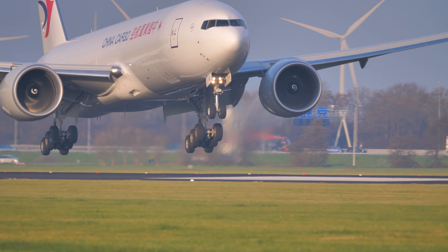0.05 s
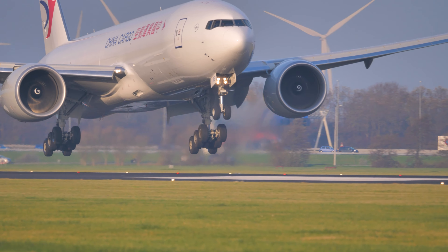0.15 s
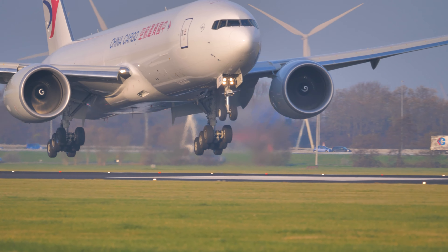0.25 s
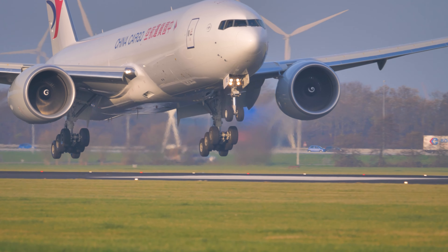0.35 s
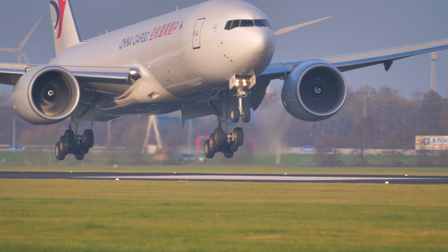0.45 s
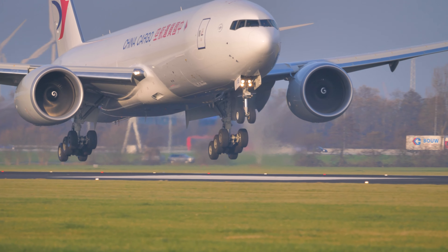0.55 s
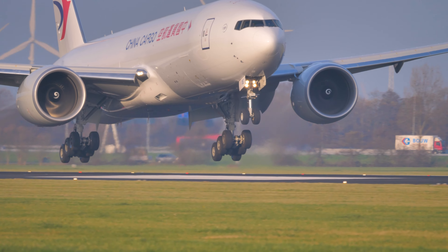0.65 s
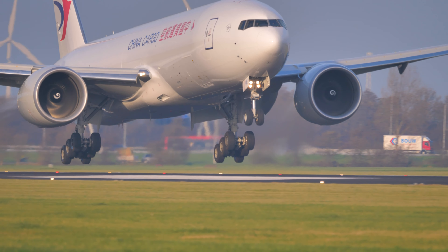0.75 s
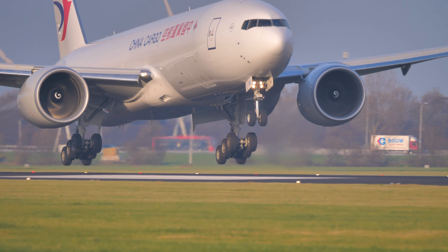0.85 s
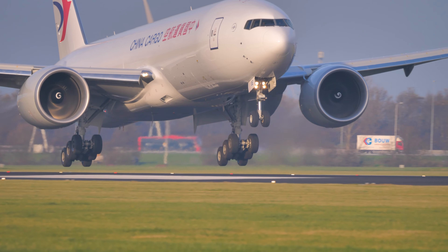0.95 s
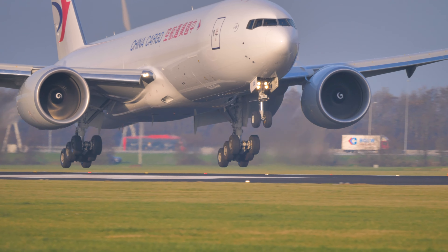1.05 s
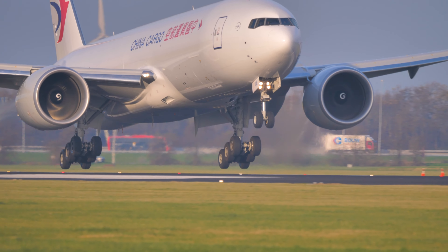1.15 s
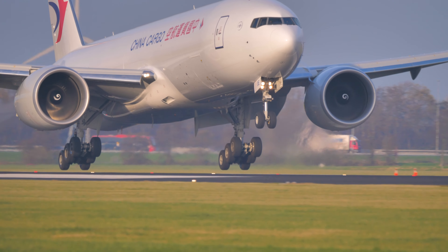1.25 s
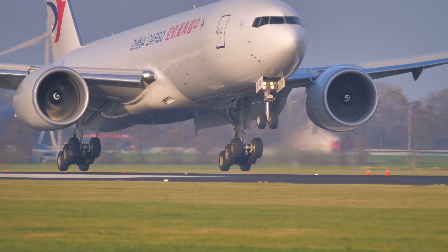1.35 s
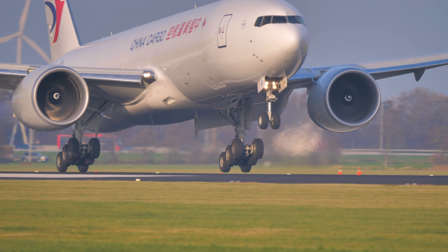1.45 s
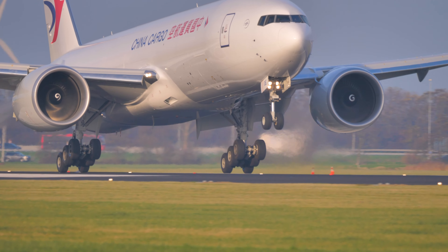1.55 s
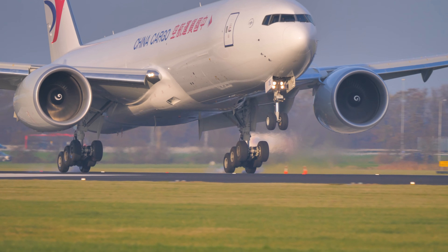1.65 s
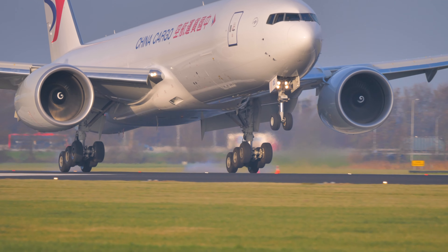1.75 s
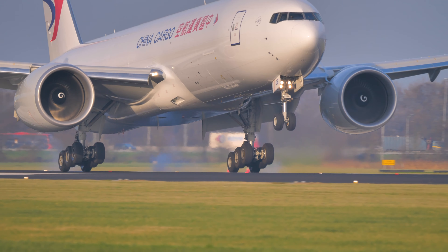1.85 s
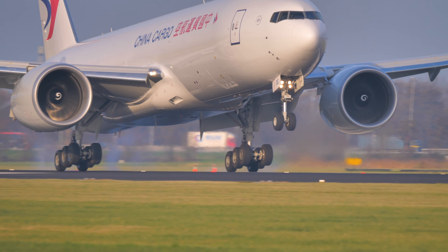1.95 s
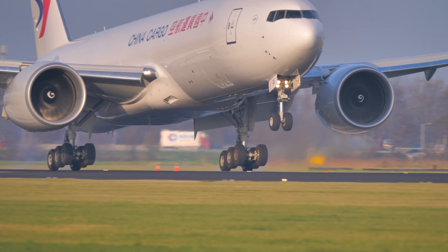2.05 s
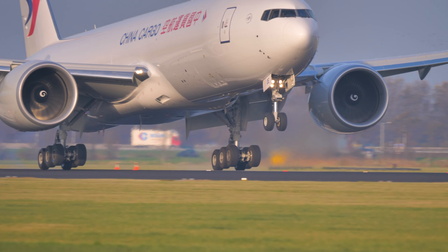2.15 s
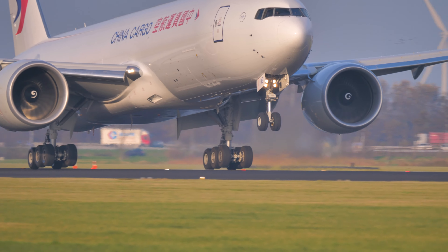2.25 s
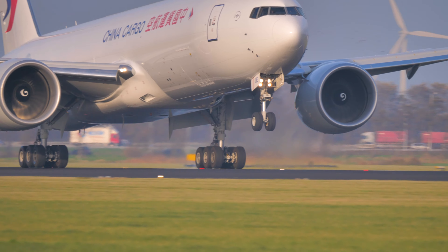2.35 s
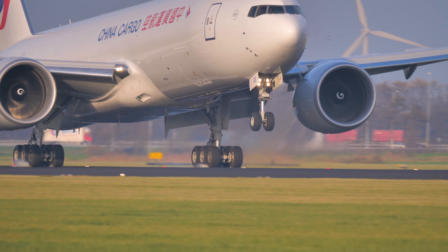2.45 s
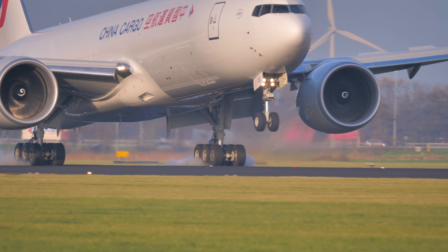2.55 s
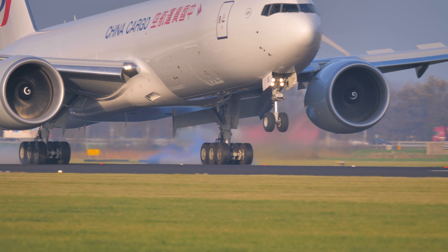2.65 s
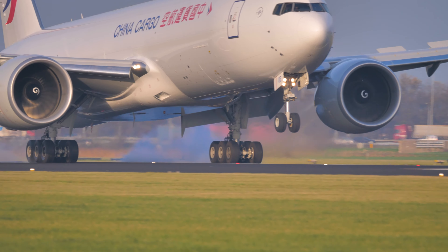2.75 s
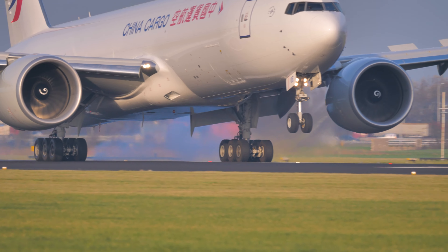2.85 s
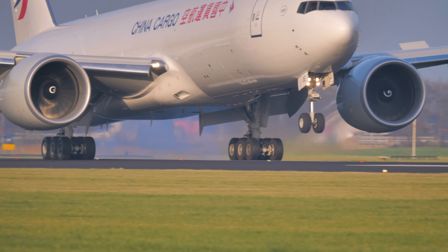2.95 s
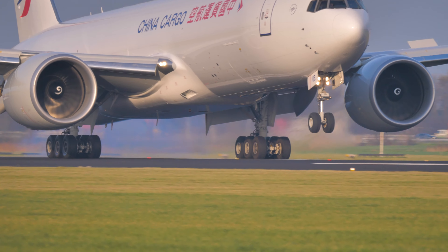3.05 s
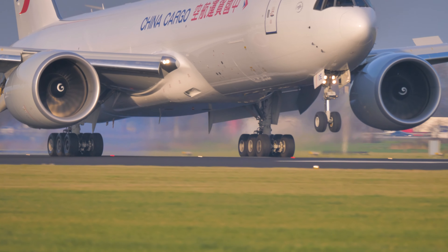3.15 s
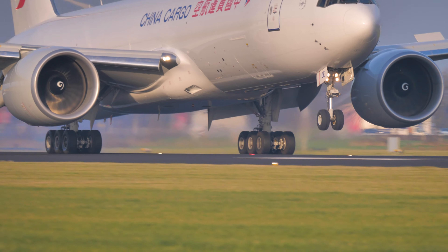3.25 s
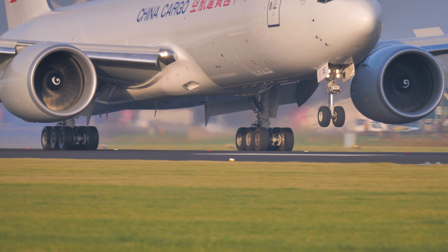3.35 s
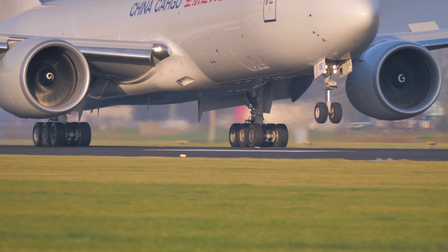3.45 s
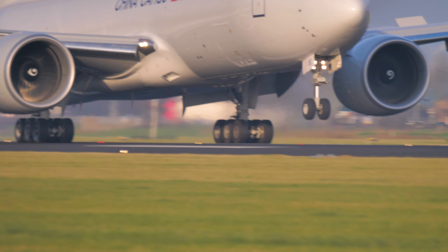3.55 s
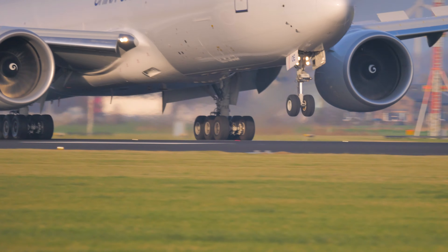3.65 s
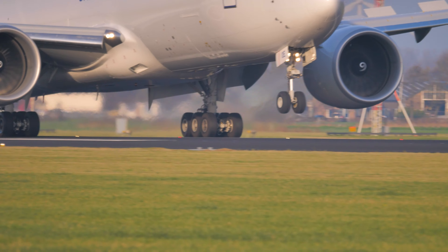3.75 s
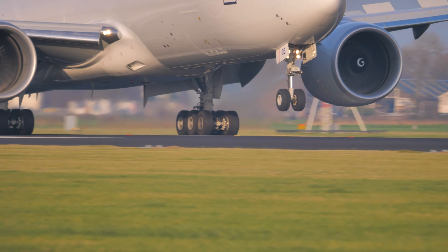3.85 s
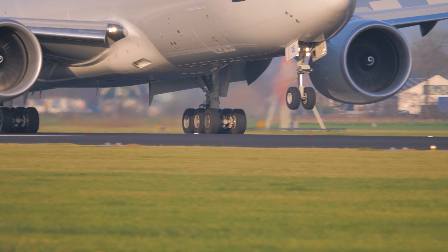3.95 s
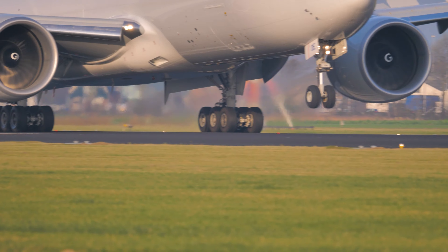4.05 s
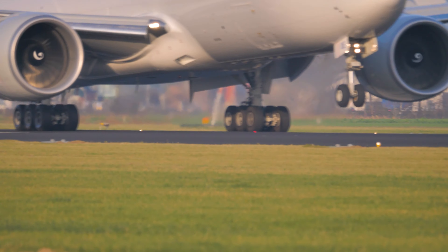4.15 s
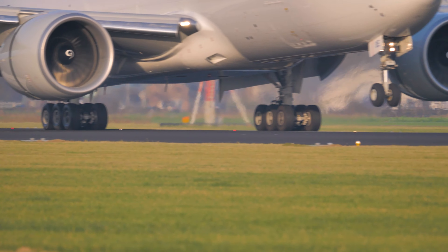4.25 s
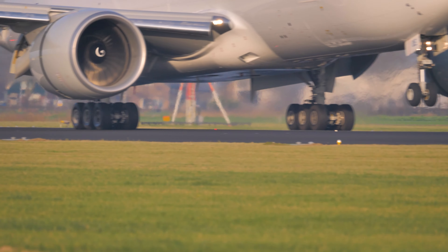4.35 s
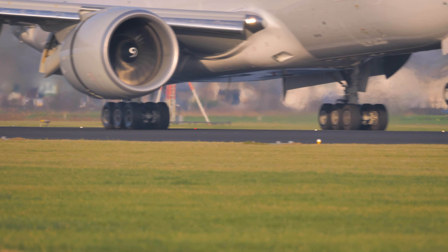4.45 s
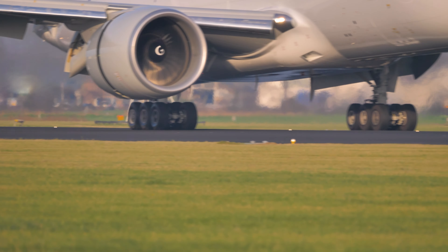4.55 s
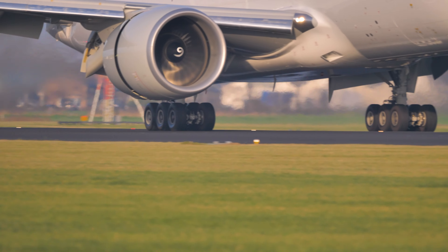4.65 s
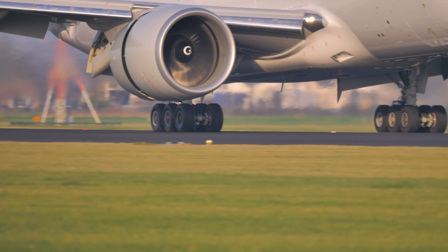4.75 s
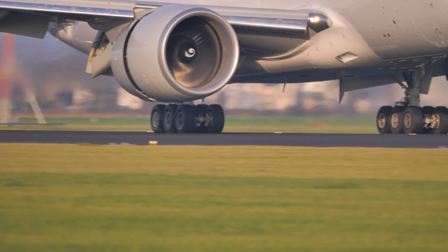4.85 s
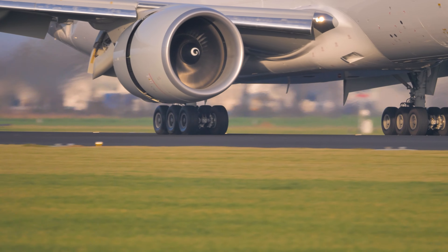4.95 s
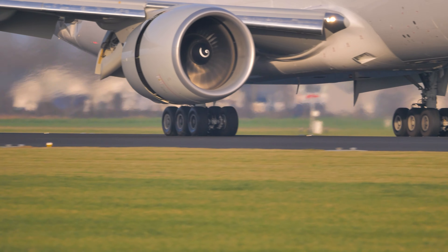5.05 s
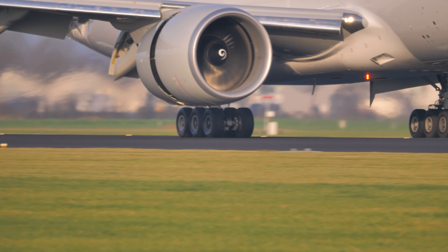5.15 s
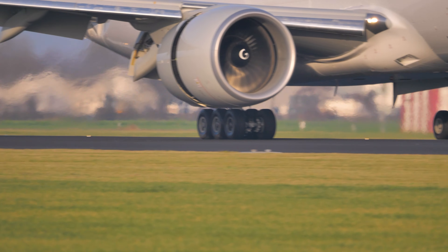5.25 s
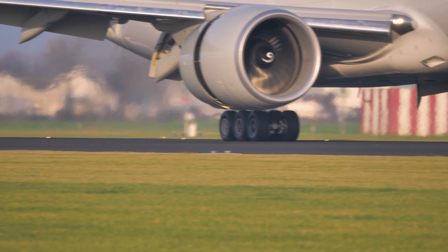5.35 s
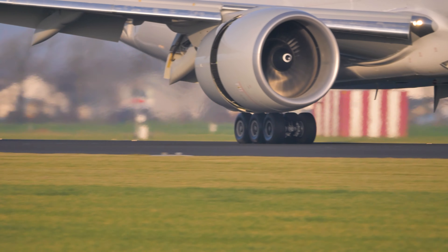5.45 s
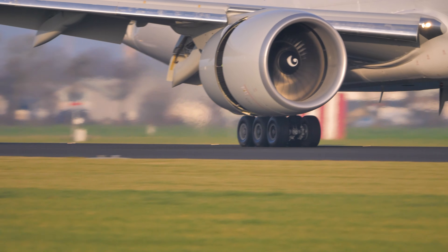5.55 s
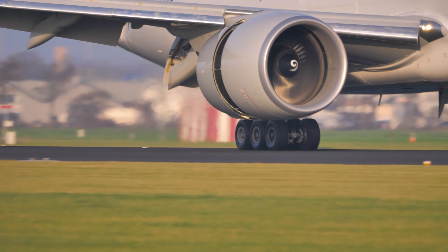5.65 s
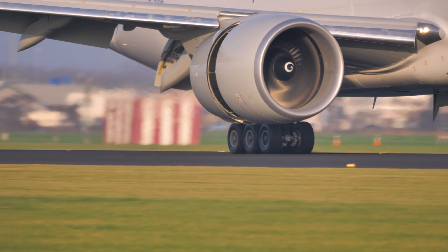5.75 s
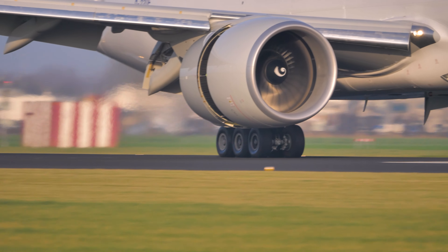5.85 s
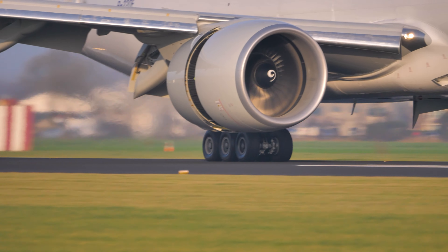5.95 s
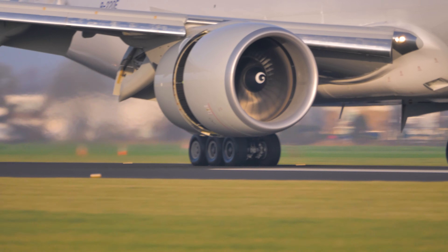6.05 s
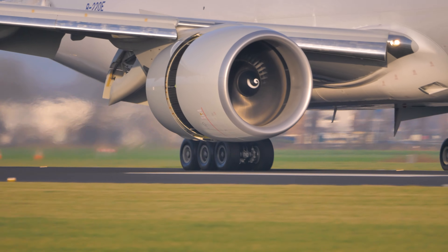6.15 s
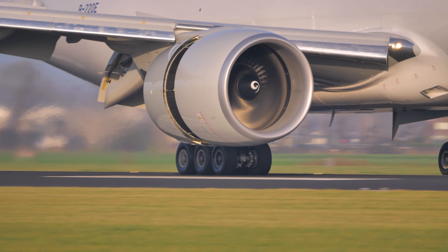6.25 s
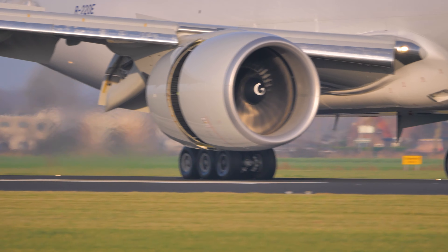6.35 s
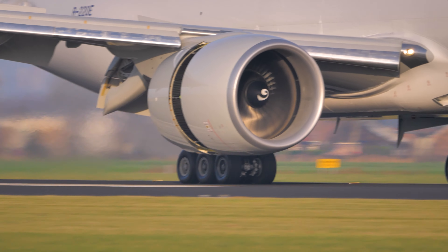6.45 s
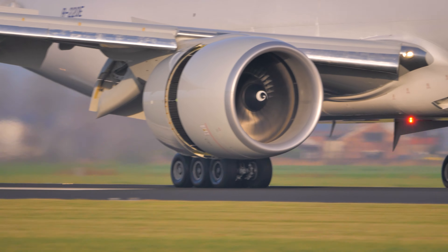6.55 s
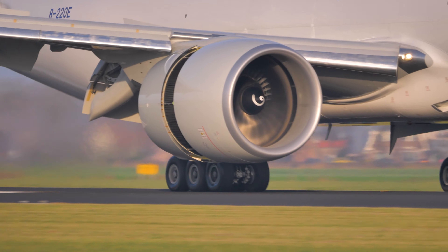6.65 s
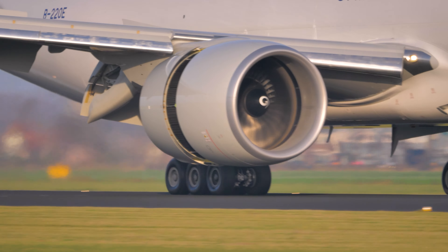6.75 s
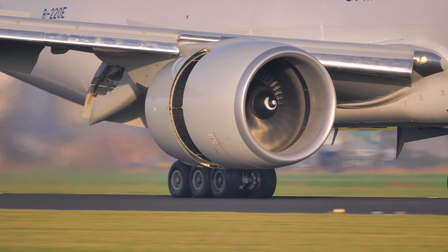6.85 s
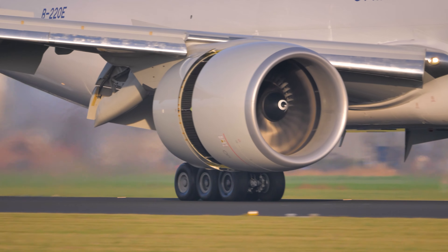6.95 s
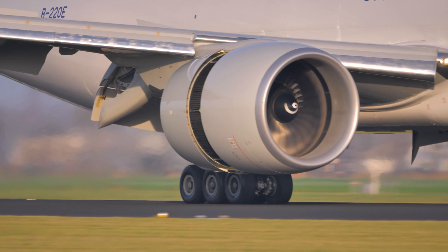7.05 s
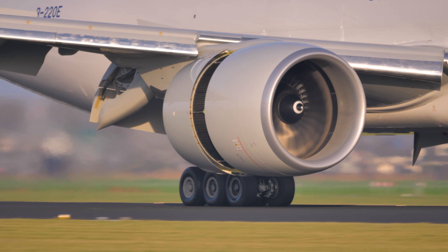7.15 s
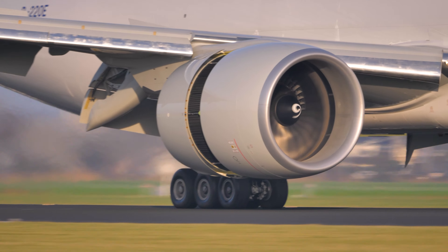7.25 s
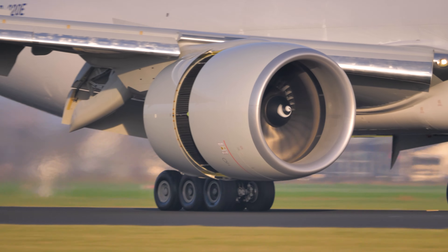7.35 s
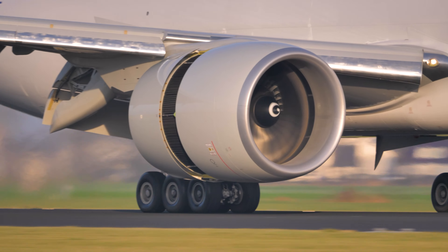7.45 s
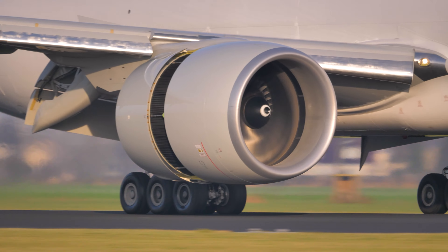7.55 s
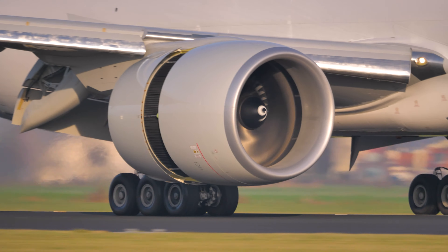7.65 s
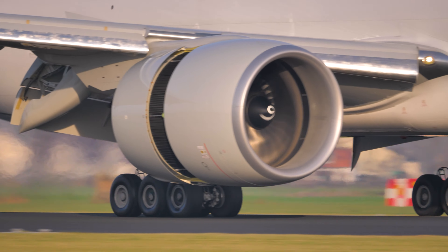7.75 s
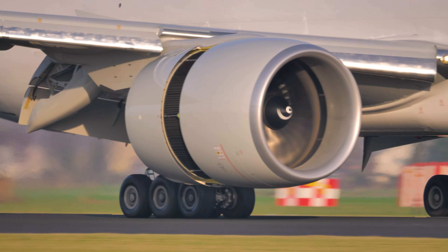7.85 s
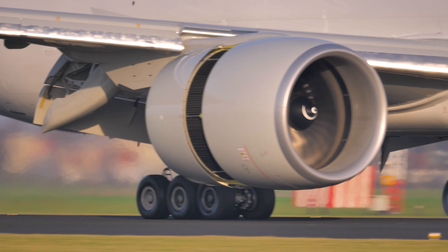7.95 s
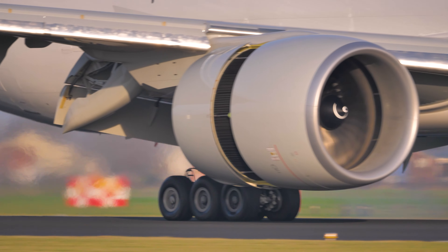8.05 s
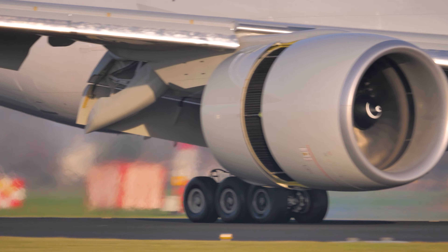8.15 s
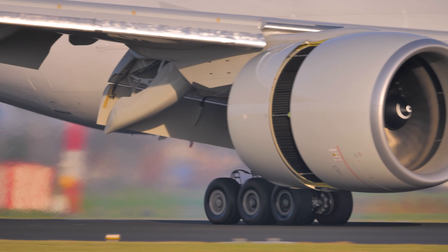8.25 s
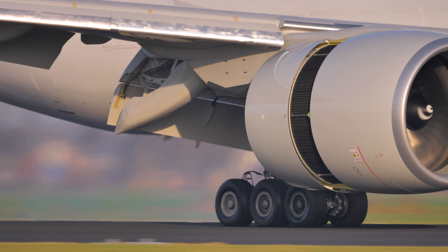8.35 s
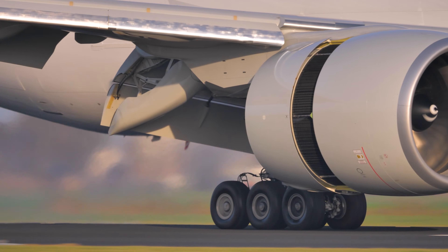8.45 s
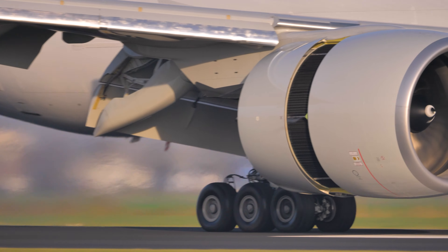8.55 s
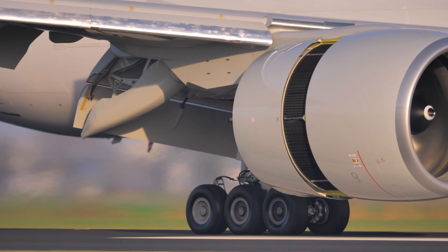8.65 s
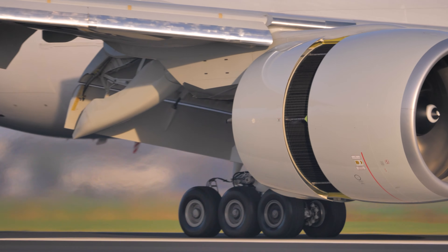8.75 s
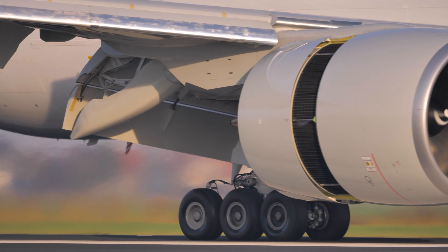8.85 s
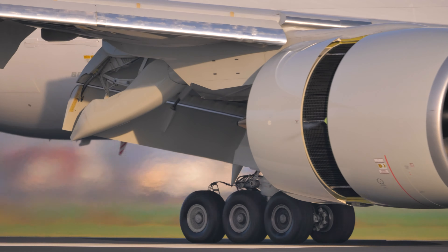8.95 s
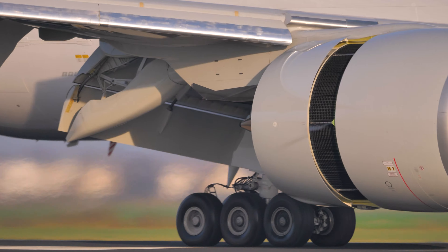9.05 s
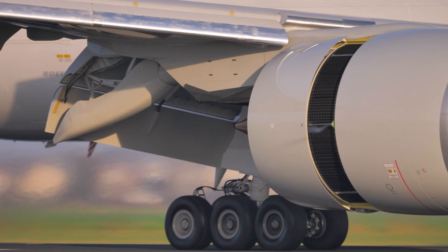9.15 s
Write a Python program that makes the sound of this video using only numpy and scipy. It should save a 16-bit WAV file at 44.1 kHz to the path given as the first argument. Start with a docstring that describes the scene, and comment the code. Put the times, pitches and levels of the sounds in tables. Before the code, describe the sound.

Outdoors beside a runway, a single-channel camera microphone is buffeted by gusty wind. A large jet's low exhaust rumble and dull distant roar come with thin fluttering whines that slowly sink as one engine spools down. A tiny bird twitters faintly early on. A second engine idles with a higher whine as the plane rolls nearer, then near eight seconds reverse thrust makes the whines jump up and the roar swell, bright and loud.

```python
"""A twin-engine jet freighter lands and rolls towards a camera beside the runway.
Coloured noise makes exhaust rumble, fan roar, a far hum and wind; low sines buffet the microphone.
A small far-off bird soon twitters in gliding sines; thin pulse bursts buzz inside the camera at 2 and 6 s.
Blade whines, fluttering tones, sink as the first engine spools down; the second is heard idling from 5 s.
Near 8 s its whines jump up with reverse thrust, while roar and rumble swell and the roar brightens."""
import sys
import numpy as np
from scipy import signal
from scipy.fft import rfft, irfft, next_fast_len
from scipy.io import wavfile
from scipy.ndimage import uniform_filter1d

SR = 44100
rng = np.random.default_rng(int(sys.argv[2]) if len(sys.argv) > 2 else 0)


def transcribe(u):
    """Save the signal u as a 16-bit wav file named by the first command-line argument.

    u: samples, shape (n,) or (channels, n), limited to [-1, 1]; the rate is SR.
    q: integer samples, one column per channel.
    """
    v = np.clip(np.atleast_2d(u).T, -1, 1)
    q = np.round(v * 32767).astype(np.int16)
    wavfile.write(sys.argv[1], SR, q)


N = 405719  # samples
SIZE, HOP = 2048, 512  # short-time spectra, samples
FRAMES = N // HOP + 5


def gain_of(db):
    """Decibels to an amplitude factor."""
    return 10 ** (np.asarray(db) / 20)


def evened(x):
    """Scales to rms 1."""
    return x / np.sqrt(np.mean(abs(x) ** 2) + 1e-20)


def read(points, hz):
    """Interpolates a spectrum table on a log-frequency axis."""
    point_hz, value = np.transpose(points)
    return np.interp(np.log(hz + 1), np.log(point_hz + 1), value)


def add(mix, start_s, sound):
    """Mixes a sound in at a time, cut off at the end of the mix."""
    part = mix[max(round(start_s * SR), 0):][:len(sound)]
    part += sound[:len(part)]


def columns(rows):
    """Sample times from a table's first to last time, then its other columns at those times."""
    point_s, *rest = np.transpose(rows)
    t = np.arange(point_s[0], point_s[-1], 1 / SR)
    return [t] + [np.interp(t, point_s, column) for column in rest]


def over_time(rows, column):
    """One column of a curve at every sample."""
    table = np.transpose(rows)
    return np.interp(np.arange(N) / SR, table[0], table[column])


def noise(colour, patchy_db, loss_db=0):
    """Random short-time spectra of a colour with drifting patches; rms 1 before the treble loss."""
    hz = np.fft.rfftfreq(SIZE, 1 / SR)[:, None]
    real, imag, patches = rng.standard_normal((FRAMES, len(hz), 3)).T
    patches = uniform_filter1d(patches, size=20, axis=0)  # over frequency
    patches = evened(uniform_filter1d(patches, size=8, axis=1))  # over time
    spectra = (real + 1j * imag) * gain_of(read(colour, hz) + patchy_db * patches)
    rms = np.std(signal.istft(spectra, nperseg=SIZE, noverlap=SIZE - HOP)[1])
    # air absorbs more the higher the pitch
    spectra = spectra * gain_of(-loss_db * (hz / 5000) ** 1.6)
    return signal.istft(spectra, nperseg=SIZE, noverlap=SIZE - HOP)[1][:N] / rms


def rumble():
    """Large eddies of the exhaust jets: low noise that swells as the aircraft nears."""
    # exhaust level: time_s, rms_db
    level = [(0, -38), (1, -34.5), (2.8, -34.5), (3.15, -37), (3.6, -34.5), (5.2, -34.5), (6, -32.5),
             (6.7, -34.5), (7.6, -30), (8, -29.5), (8.85, -22), (9.2, -21.5)]
    # exhaust spectrum: freq_hz, relative_db_per_hz
    colour = [(30, -25), (65, -1), (110, -0.5), (170, -4.5), (215, -9.5), (270, -12.5), (420, -22),
              (650, -30), (1200, -51), (4000, -120)]
    return gain_of(over_time(level, column=1)) * noise(colour, patchy_db=.6)


def roar():
    """Broad fan and reverser noise, duller while far because air absorbs treble."""
    # approach: time_s, rms_db before air loss, air_loss_at_5khz_db
    approach = [(0, -51.5, 21.5), (.7, -53, 19), (3.2, -49.5, 17), (4.3, -48, 14.5), (5, -45, 17),
                (5.6, -43.5, 14), (6.5, -40, 12.5), (7.3, -40.5, 10), (7.85, -38, 7), (8.2, -34, 5.5),
                (8.45, -32, 3), (8.7, -27, 2), (8.9, -25, 0), (9.2, -26, 2)]
    # fan spectrum at the source: freq_hz, relative_db_per_hz
    colour = [(150, -50.5), (420, -6), (600, -2), (850, 0), (1300, -1), (1700, -3.5), (2200, -6),
              (3100, -8.5), (4000, -18.5), (5000, -22), (6300, -33), (7500, -38), (9000, -53),
              (11800, -76.5)]
    frame_at = np.minimum(np.arange(FRAMES) * HOP, N - 1)
    loss_db = over_time(approach, column=2)[frame_at]
    return gain_of(over_time(approach, column=1)) * noise(colour, patchy_db=0.95, loss_db=loss_db)


def treble_hollows(x):
    """Two hollows in the treble, as from reflections near the microphone."""
    # hollows: centre_hz, width_hz, depth_db
    hollows = [(3463, 200, -10), (4424, 500, -9)]
    size = next_fast_len(N + 4096)
    hz = np.fft.rfftfreq(size, 1 / SR)
    dips_db = sum(db * np.exp(-((hz - f) / width) ** 2 * 2) for f, width, db in hollows)
    return irfft(rfft(x, size) * gain_of(dips_db), size)[:N]


def field():
    """Steady far hum of roads and other aircraft."""
    # hum spectrum: freq_hz, relative_db_per_hz
    colour = [(200, -14.5), (400, -1), (700, -9), (1300, -12.5), (2400, -18.5), (3600, -31.5), (4300, -50),
              (6000, -80.5)]
    field_rms_db = -55
    return gain_of(field_rms_db) * noise(colour, patchy_db=0.68)


def wind():
    """Lumpy pressure on the microphone; each gust climbs to its crest and sinks back to the lull."""
    # gusts, power added to the lull: crest_s, crest_db
    gusts = [(.02, -38.5), (.41, -29.5), (.9, -30.5), (1.48, -34), (2.1, -32.5), (2.891, -37.5),
             (3.6, -37.5), (4.46, -33.5), (4.99, -36.5), (5.35, -32), (5.94, -32.5), (7.22, -31.5),
             (8.41, -28.5), (8.81, -33), (9.19, -30.5)]
    # wind spectrum: freq_hz, relative_db_per_hz
    colour = [(10, -19), (25, -2.5), (45, 4.5), (80, -5.5), (150, -14.5), (300, -24), (2000, -120)]
    lull_db, rise_db_per_s, fall_db_per_s = -42.5, 40.5, 31
    t = np.arange(N) / SR
    power = gain_of(2 * lull_db)
    for crest_s, crest_db in gusts:
        below_crest_db = np.minimum(rise_db_per_s * (t - crest_s), fall_db_per_s * (crest_s - t))
        power = power + gain_of(2 * (crest_db + below_crest_db))
    return np.sqrt(power) * noise(colour, patchy_db=.6)


def whine(pitch_hz, start_s, turn_s, end_s, *aims_db):
    """A blade tone, part steady, part smeared by turbulent air into a fluttering core and wider skirt."""
    roots = np.sqrt(gain_of(aims_db))  # levels interpolate as square roots of amplitude
    t, root = columns(list(zip((start_s, turn_s, end_s), roots)))
    hz = np.interp(t, np.arange(N) / SR, pitch_hz)
    flutter = .7  # steady part
    for width_hz, db in ((34, 0), (110, -3)):
        z = rng.standard_normal((len(t), 2)) @ [1, 1j]
        away = np.fft.fftfreq(len(t), 1 / SR) / width_hz
        flutter = flutter + gain_of(db) * evened(np.fft.ifft(np.fft.fft(z) / (1 + away ** 4)))
    carrier = np.exp(2j * np.pi * np.cumsum(hz) / SR)
    tone = np.sqrt(2) * (evened(flutter) * carrier).real
    # 0.15 s fades, except at the ends of the scene
    rise = (t - t[0]) / .15 if t[0] > .05 else 1
    fall = (t[-1] - t) / .15 if t[-1] < N / SR - .05 else 1
    return t[0], root ** 2 * tone * np.clip(np.minimum(rise, fall), 0, 1)


def whines():
    """Fan tones follow the fan; fan blades chop the core tone into a ladder of sum tones."""
    # engine heard first, spooling down: time_s, fan_blade_rate_hz, core_tone_hz
    first_engine = [(0, 632, 2860), (.5, 627.5, 2860), (1, 609.5, 2860), (2, 551, 2847), (3, 509.4, 2854),
                    (4, 466, 2865), (5.3, 422, 2857), (6.2, 410, 2900), (7.1, 372, 2900)]
    # engine heard later, idling, then wound up for reverse: time_s, fan_blade_rate_hz, core_tone_hz
    second_engine = [(5.1, 387, 3060), (5.5, 385, 3012), (6, 380, 2986), (7, 366, 2916), (7.9, 352, 2913),
                     (7.95, 430, 3105), (8.5, 466, 3146), (9.2, 498, 3190)]
    # SPAN below: start_s, turn_s (may lie outside the span), end_s, then the level in dB aimed at for each
    # first fan: multiple of blade rate, SPAN
    fan_tones = [(3.63, 0, .3, 0.79, -68, -68, -77), (4, 0, .7, 1.7, -70, -65.5, -73.5),
                 (4, 1.7, 3.2, 4.2, -72.5, -62.5, -64), (4.27, .1, 2.2, 2.7, -77.5, -67, -84),
                 (4.61, 0, .45, .8, -71, -61.5, -70.5), (4.61, .7, 1, 1.6, -75, -78, -76.5),
                 (4.97, 0, .3, 1.2, -79.5, -78, -79), (6.24, 0, .8, 2, -87, -85, -91),
                 (6.24, 2.2, 3.6, 5.6, -76.5, -69, -69)]
    # steady pitch: pitch_hz, SPAN
    held_tones = [(3875, .7, 1.3, 1.8, -90, -85, -85), (3140, 4.85, 4.6, 5.25, -56, -55, -58.5)]
    # first engine's sums, row n is core tone + n blade rates: SPAN
    first_sums = [(1.6, 3.8, 4.7, -83, -63.5, -73), (1.7, 4.9, 5.4, -76, -61.5, -72),
                  (1.5, 4.1, 5.4, -87, -67.5, -76.5), (2.2, 4.2, 5.9, -103, -88, -95),
                  (2.6, 4.6, 6.3, -105, -91, -100), (2.8, 3.6, 7.1, -108, -86.5, -87)]
    # second engine's sums while idling: SPAN
    idle_sums = [(5.1, 6.7, 7.92, -59.5, -54, -55), (5.5, 7.2, 7.92, -73.5, -61.5, -60.5),
                 (5.4, 9, 7.92, -84.5, -73.5, -80)]
    # second engine's sums in reverse thrust: SPAN
    reverse_sums = [(7.93, 8.6, 8.85, -57, -47, -47), (7.93, 8.75, 9.2, -60.5, -46.5, -53.5),
                    (7.93, 8.74, 9.2, -76, -52, -60)]
    mix = np.zeros(N)
    for multiple, *row in fan_tones:
        add(mix, *whine(multiple * over_time(first_engine, column=1), *row))
    for hz, *row in held_tones:
        add(mix, *whine(np.full(N, hz), *row))
    ladders = (first_engine, first_sums), (second_engine, idle_sums), (second_engine, reverse_sums)
    for engine, sums in ladders:
        fan_hz, core_hz = over_time(engine, column=1), over_time(engine, column=2)
        for step, row in enumerate(sums):
            add(mix, *whine(core_hz + step * fan_hz, *row))
    return mix


def buffet(start_s, level_db, base_hz):
    """A low push of wind on the microphone that sinks in pitch, with a rough upper partial."""
    length_s = 0.055
    t = np.arange(0, length_s, 1 / SR)
    turns = base_hz * t * (1.3 - 0.27 * t / length_s) + rng.random()  # 1.3 to 0.76 of base_hz
    push = np.sin(2 * np.pi * turns) + 0.43 * np.sin(2 * np.pi * (1.696 * turns + rng.random()))
    return start_s, gain_of(level_db) * push * np.hanning(len(t))


def buffets():
    """Single buffets of wind on the microphone."""
    # buffets: start_s, main_partial_db, base_hz
    rows = [(.01, -22.5, 60), (.3, -23.5, 78), (.38, -19, 62), (.89, -23.5, 69.4), (2.1, -21.5, 84),
            (3.53, -24.5, 70.4), (5.26, -27.5, 91.7), (5.9, -28.5, 80), (7.58, -21.5, 95.3),
            (8.12, -18.5, 111), (8.78, -17, 95)]
    mix = np.zeros(N)
    for row in rows:
        add(mix, *buffet(*row))
    return mix


def bird_note(rows):
    """A pure gliding whistle with tapered ends."""
    t, hz, level_db = columns(rows)
    tone = np.sin(2 * np.pi * np.cumsum(hz) / SR)
    return t[0], gain_of(level_db) * tone * signal.windows.tukey(len(t), .2)


def twitter():
    """A small bird far off: quick whistled notes."""
    # one table a note: time_s, pitch_hz, level_db
    notes = [
        [(.172, 5900, -91), (.178, 5100, -83), (.186, 4650, -96), (.196, 4900, -84), (.208, 4700, -91),
         (.216, 5000, -84), (.224, 5700, -92)],
        [(.757, 5000, -93), (.765, 5200, -87), (.776, 5100, -91)],
        [(1.322, 4750, -88), (1.332, 4900, -84), (1.338, 5400, -80), (1.344, 6600, -94), (1.349, 5200, -84),
         (1.353, 4300, -88)],
    ]
    mix = np.zeros(N)
    for rows in notes:
        add(mix, *bird_note(rows))
    return mix


def buzz(start_s, peak_db, pulse_hz, length_s):
    """A burst of sharp regular pulses; harmonics 5 to 9 alone make it thin and bright."""
    t = np.arange(0, length_s, 1 / SR)
    pulses = sum(np.cos(2 * np.pi * k * pulse_hz * t) / k for k in range(5, 10))
    return start_s, gain_of(peak_db) * pulses / pulses[0] * signal.windows.tukey(len(t), .4)


def buzzes():
    """Short buzzes inside the camera."""
    # buzzes: start_s, peak_db, pulse_hz, length_s
    rows = [(2.065, -66, 955, .011), (6.06, -69, 1000, .009)]
    mix = np.zeros(N)
    for row in rows:
        add(mix, *buzz(*row))
    return mix


def scene():
    """Engines, airfield, wind, bird and camera, in one channel."""
    engines = rumble() + treble_hollows(roar()) + whines()
    surroundings = field() + wind() + buffets() + twitter() + buzzes()
    return (engines + surroundings)[None]


def record(dry):
    """Adds the hiss of the preamplifier, then the band limit."""
    # hiss spectrum: freq_hz, relative_db_per_hz
    colour = [(3000, 3), (5000, 1.5), (6500, 1.5), (9000, 1), (11000, 0.5), (12000, -1)]
    hiss_rms_db, edge_hz = -85, 12000  # hiss level ahead of the band limit
    wet = dry + gain_of(hiss_rms_db) * noise(colour, patchy_db=.3)
    lowpass = signal.firwin(1023, edge_hz, window=("kaiser", 9), fs=SR)
    return signal.oaconvolve(wet, lowpass[None], "same")


dry = scene()
out = record(dry)
transcribe(out)
```